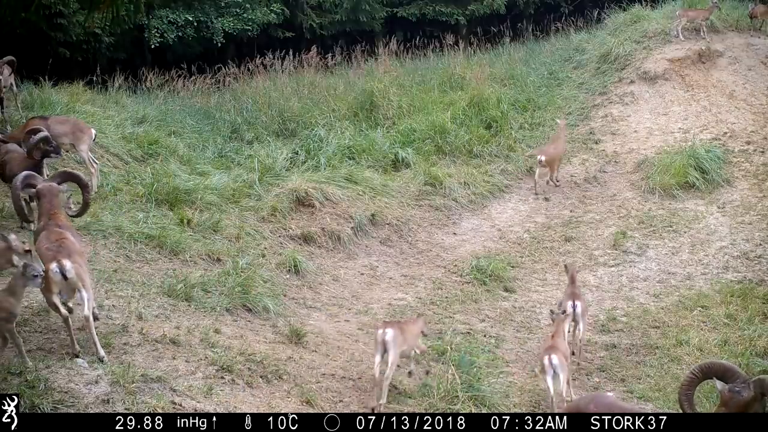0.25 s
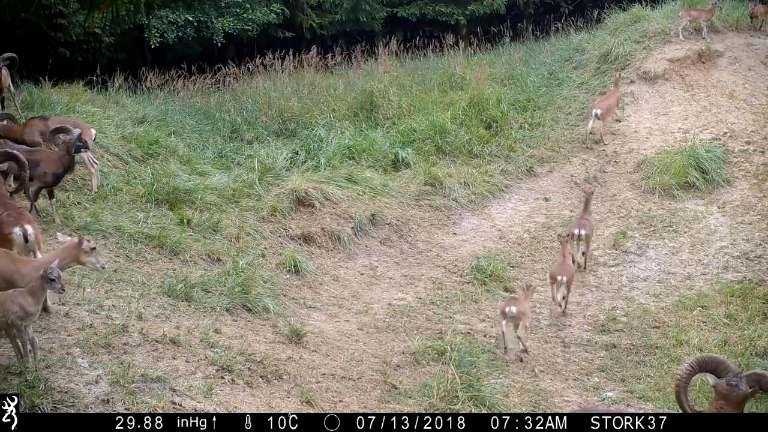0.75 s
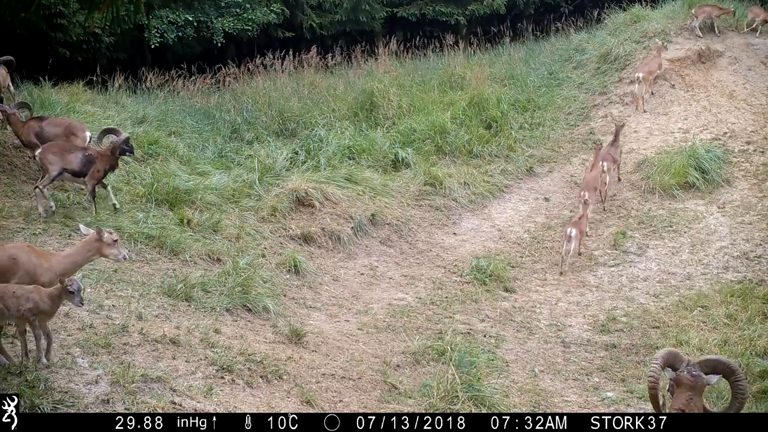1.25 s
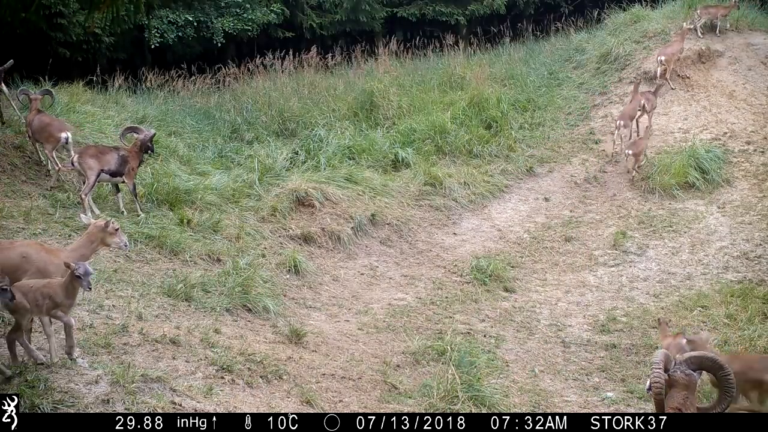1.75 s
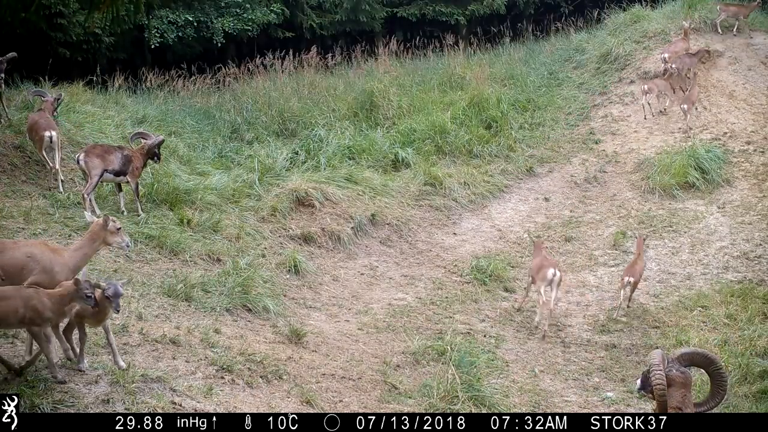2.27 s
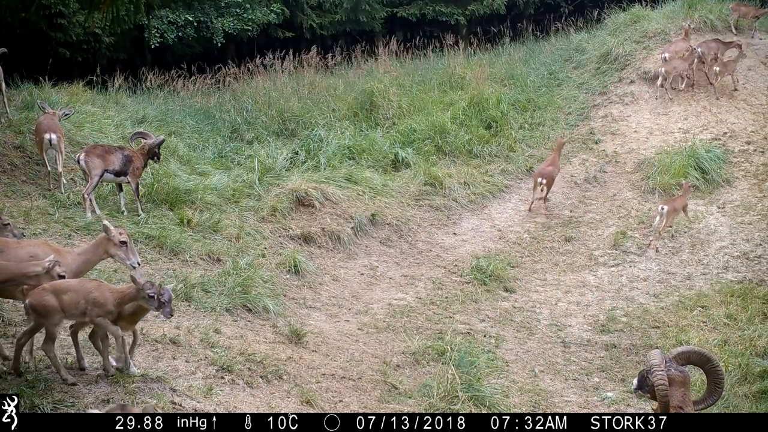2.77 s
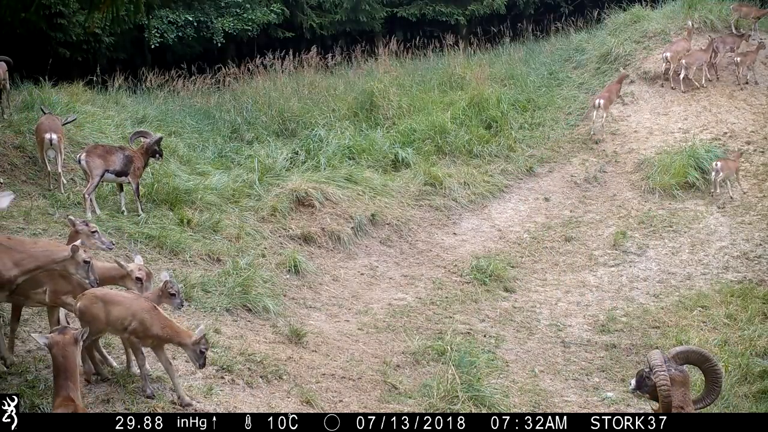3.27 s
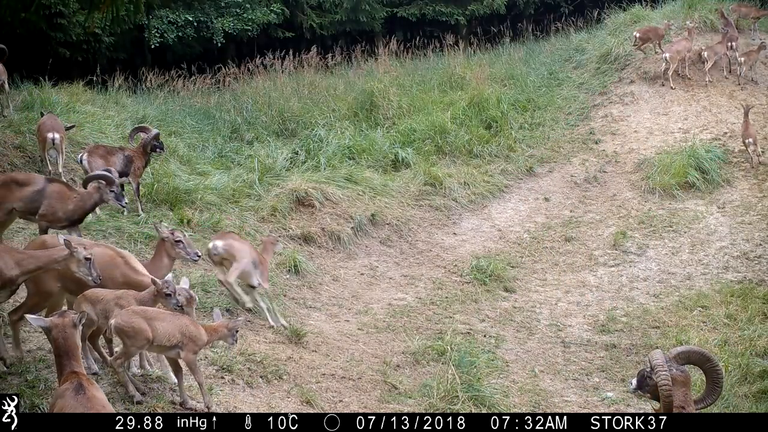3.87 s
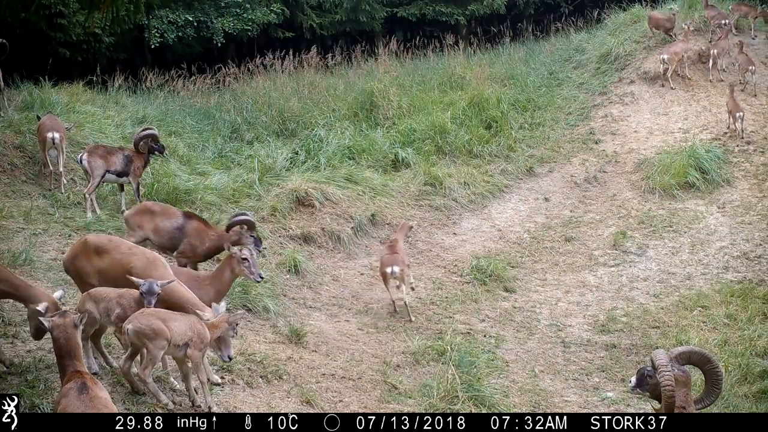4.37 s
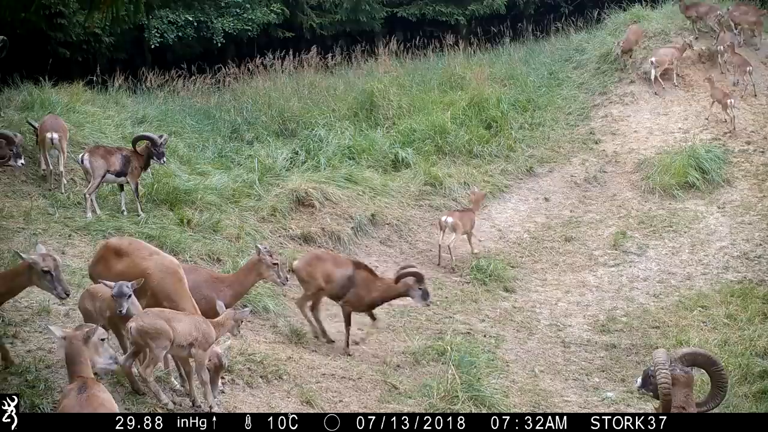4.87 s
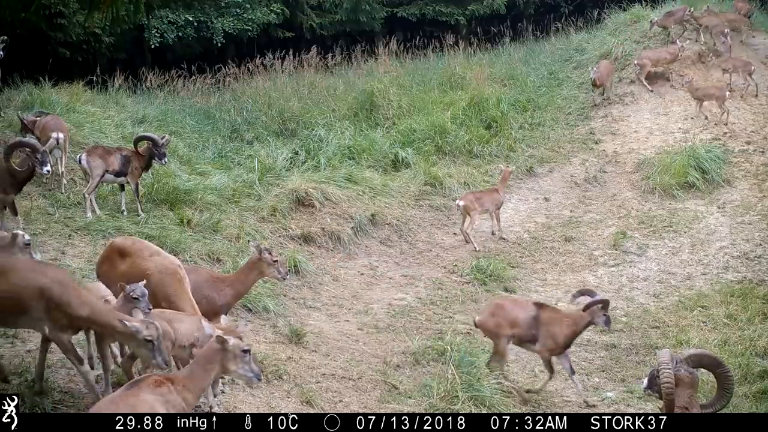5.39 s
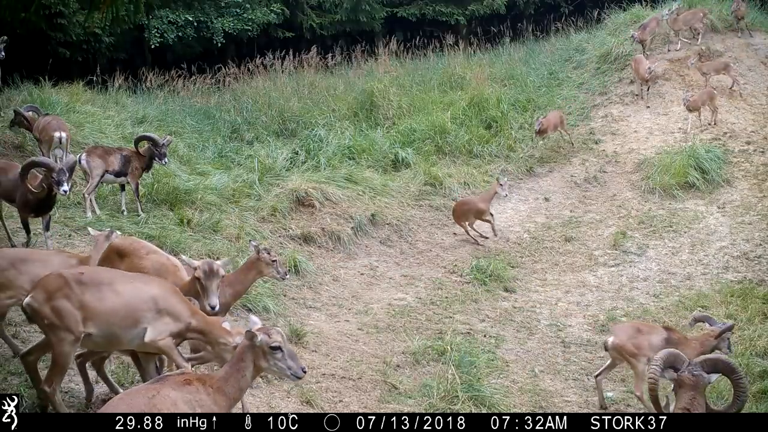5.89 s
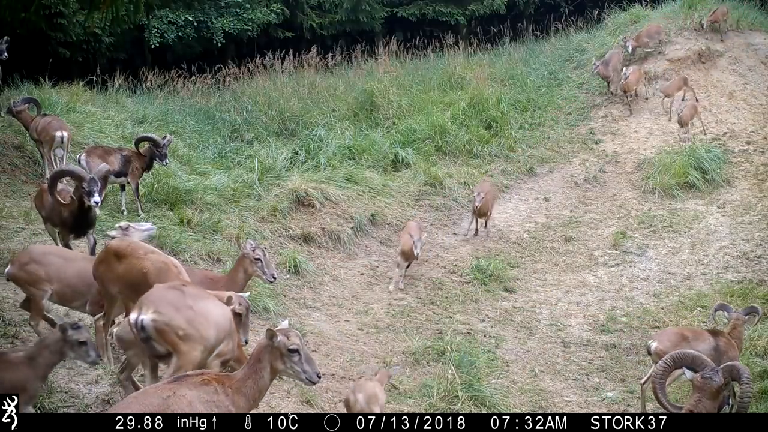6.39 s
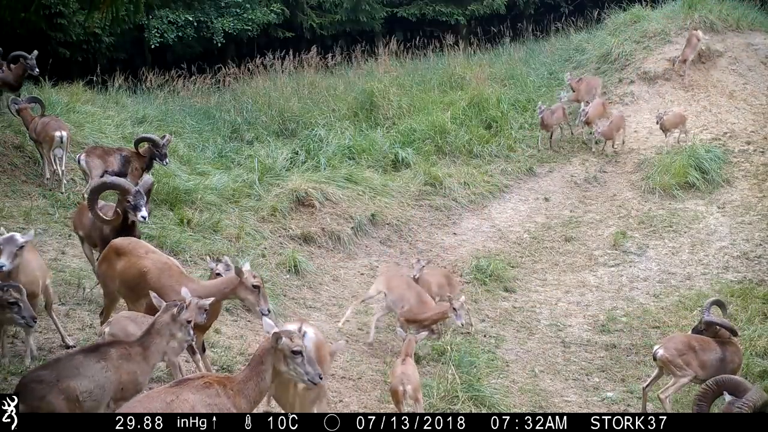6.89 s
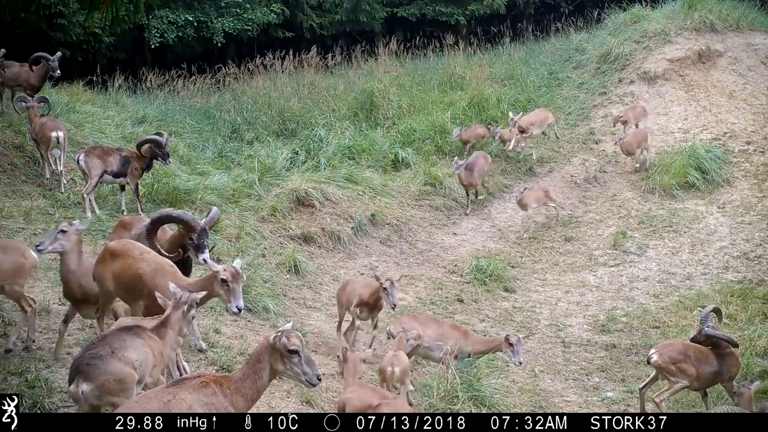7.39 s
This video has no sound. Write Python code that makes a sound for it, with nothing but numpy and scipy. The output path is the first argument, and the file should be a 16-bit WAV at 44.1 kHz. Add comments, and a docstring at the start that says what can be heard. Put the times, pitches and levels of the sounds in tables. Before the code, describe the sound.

On an open dry slope beside trees, a low ewe's bleat is already ending at 0 s and dies within about 0.1 s, leaving a faint woodland echo. From 0.2 to 0.65 s close hooves thud on soil, knock grit and snap stalks, with grassy scuffs. Soft snorts come near 0.9 and 1.1 s. A heavier burst of thuds and cracks falls at 1.2-1.4 s, with a sharp snap at 1.7 s. Steps then grow sparse and softer, around 2.9-4.3 s. At about 4.5 s a lamb hums with its mouth shut, then opens into a bright, quavering bleat from 4.75 to 5.1 s, echoing faintly. Scattered hoofsteps follow at 5.1-5.6 s, with snorts near 6.2 and 7.3 s and a brushing scuff by the end. Fluttering grass hiss, distant patter and low rumble persist, heard through a dull, narrow-band microphone.

```python
"""A ewe's low bleat dies away close to a small camera microphone, on a dry slope where wild sheep mill about.
Hooves thud on soil, knock on grit, snap stalks and scuff grass, by decaying rings and noise bursts.
Later a lamb hums, opens its mouth and bleats in quavering throbs: vocal-fold snaps ring a changing throat.
The forest edge answers with a noise tail; soft snorts, farther hooves, fluttering hiss and rumble fill the air."""
import sys
import numpy as np
from scipy import signal
from scipy.fft import rfft, irfft, next_fast_len
from scipy.io import wavfile
from scipy.ndimage import map_coordinates

SR = 44100
rng = np.random.default_rng(int(sys.argv[2]) if len(sys.argv) > 2 else 0)


def put_to_file(sound):
    """Save the sound as 16-bit audio at rate SR, in the file named by the first command-line argument."""
    columns = np.atleast_2d(sound).T  # one column per channel
    safe = np.clip(columns, -1, 1)
    whole_steps = np.round(safe * 32767)
    wavfile.write(sys.argv[1], SR, whole_steps.astype(np.int16))


N = 336905
TIME = np.arange(N) / SR
TOP_HZ = 4500  # top of the camera's band
KNOCK_HZ = 644  # middle of a hoof's knock on grit

# The nearest hooves landing.
# Each row: start in seconds, thud on soil in dB, knock on grit in dB before dulling, snap of stalks in dB.
HOOVES = [(0.211, -21.5, -20, -23), (.309, -21, -11.5, -33), (0.319, -13.5, -15.5, -12),
          (.348, -15.5, -15, -10.5), (.514, -30.5, -21, -20), (0.651, -18, -23, -28),
          (1.199, -24.5, -25, -15.5), (1.290, -9, -28, -19.5), (1.310, -9.5, -30, -10),
          (1.320, -10.5, -9, -25), (1.361, -28, -36, -18), (1.378, -18.5, -30, -39), (1.692, -20, -33, -19),
          (1.714, -13, -10, -4.5), (2.935, -25, -43, -44), (3.038, -36, -28, -38), (3.334, -39, -34, -21),
          (3.486, -27.5, -21.5, -39), (3.534, -36, -19.5, -38), (3.929, -37, -27.5, -40.5),
          (4.304, -25.5, -36, -40), (5.127, -19, -33.5, -34.5), (5.524, -21.5, -19, -18),
          (5.5827, -30, -14, -21), (6.264, -42, -26, -17), (7.139, -18.5, -36, -25),
          (7.346, -24.5, -36, -35)]


def amp(db):
    """Decibels to gain."""
    return 10 ** (np.asarray(db) / 20)


def unit(x):
    """Scale to rms 1."""
    return x / np.sqrt(np.mean(x ** 2) + 1e-20)


def colour(points):
    """Gain against frequency from (Hz, dB) points on a log axis."""
    point_hz, point_db = np.transpose(points)
    return lambda hz: amp(np.interp(np.log(hz + 1), np.log(point_hz), point_db))


def resonances(modes):
    """Response of parallel damped resonances (Hz, width Hz, dB), their signs alternating."""
    def response(hz):
        total = 0
        for k, (centre, width, db) in enumerate(modes):
            damping = 1j * hz * width
            total = total + (-1) ** k * amp(db) * damping / (centre * centre - hz * hz + damping)
        return total
    return response


def filtered(x, response):
    """Pass x through a response of frequency, with spare room for the ringing."""
    size = next_fast_len(len(x) + SR // 20)
    spectrum = rfft(x, size) * response(np.fft.rfftfreq(size, 1 / SR))
    return irfft(spectrum, size)[:len(x)]


def wobble(rate):
    """A smooth random curve through `rate` knots a second."""
    knots = rng.standard_normal(int(N * rate / SR) + 4)
    return map_coordinates(knots, [TIME * rate])


def add(track, start, sound):
    """Mix a sound into the track at a start in seconds."""
    part = track[max(round(start * SR), 0):][:len(sound)]
    part += sound[:len(part)]


def stir():
    """How much the herd stirs the grass at each sample, as a level in dB."""
    # Each row: time in seconds, level of the rustle in dB before its own lift and flutter.
    herd_stir = [(0.1, -37.5), (0.25, -38.5), (0.85, -46.5), (1.84, -44), (2.31, -47.5), (4.05, -50),
                 (4.55, -48.5), (4.6, -46.5), (5.35, -44.5), (5.96, -47), (6.34, -43.5), (6.61, -44.5),
                 (7.01, -40.5), (7.64, -44)]
    return np.interp(TIME, *np.transpose(herd_stir))


def background(rustle_db=2, rumble_db=-40.5, rumble_follows=0.16):
    """Low outdoor rumble and a fluttering hiss of grass, both shaped noise; the hiss swells as the herd stirs."""
    # Colour of the low rumble. Each row: frequency in Hz, density in dB per Hz.
    rumble_colour = [(20, -17.5), (40, -10.5), (55, 4.5), (70, -3), (100, -5), (150, -11), (280, -13.5),
                     (450, -16), (900, -24.5), (2000, -85.5)]
    # Colour of the rustling grass. Each row: frequency in Hz, density in dB per Hz.
    rustle_colour = [(100, -9.5), (400, 1.5), (700, 0), (1200, 0), (2200, -0.5), (3400, 0.5), (4500, -5)]
    stir_db = stir()
    rumble = unit(filtered(rng.standard_normal(N), colour(rumble_colour)))
    rustle = unit(filtered(rng.standard_normal(N), lambda hz: colour(rustle_colour)(hz) * (hz < TOP_HZ)))
    # The rumble follows only a share of the herd's stir.
    rumble_level_db = rumble_db + rumble_follows * (stir_db - stir_db.mean()) + 0.75 * wobble(16)
    flutter_db = 0.9 * wobble(25) + 1.1 * wobble(200)
    return rumble * amp(rumble_level_db) + rustle * amp(rustle_db + stir_db + flutter_db)


def herd(count=110, step_db=-49, knock_db=-57, tick_db=-53.0, spread_db=3, follows=0.5):
    """Farther hooves patter at random: dull bump, knock of grit, tick of grass, harder as the herd stirs."""
    blows, stir_db = np.zeros((3, N)), stir()
    places = rng.integers(0, N, count)
    chances = np.clip(rng.standard_normal((count, 3)), -2, 1.5)
    for place, chance in zip(places, chances):
        blows[:, place] = amp(spread_db * chance + follows * stir_db[place])
    soil = filtered(blows[0], lambda hz: resonances([(190, 170, 0)])(hz) ** 2)
    grit = filtered(blows[1], resonances([(KNOCK_HZ, 500, 0)]))
    grass = filtered(blows[2], resonances([(2000, 12000, 0)]))
    return amp(step_db) * unit(soil) + amp(knock_db) * unit(grit) + amp(tick_db) * unit(grass)


def swishes(rows, width, grain_db):
    """Swells of grainy noise, each in one broad resonance; width is a fraction of its centre."""
    out = np.zeros(N)
    for start, half, db, hz in rows:
        t = np.arange(-3 * half, 3 * half, 1 / SR)
        grains = rng.standard_normal(len(t)) * amp(grain_db * rng.standard_normal(len(t)))
        swish = unit(filtered(grains, lambda f: resonances([(hz, width * hz, 0)])(f) * (f < TOP_HZ)))
        swell = np.exp(-(t / half) ** 2 / 2)
        add(out, start + t[0], amp(db) * swish * swell)
    return out


def scuffs(half_s=0.016, centre_hz=2200):
    """Legs brush through dry grass in short, very grainy swishes."""
    # Each row: middle of the scuff in seconds, level in dB.
    brushes = [(.208, -33.5), (.535, -37.5), (.612, -34.5), (1.19, -32.5), (1.73, -39), (2.065, -34.5),
               (4.01, -39.5), (7.325, -30.5)]
    rows = [(at, half_s, db, centre_hz) for at, db in brushes]
    return swishes(rows, width=2.0, grain_db=6.0)


def thuds(t60=0.058, rise=0.0015, crumble=0.43, crumble_t60=0.096):
    """Soil gives a few low cycles under each hoof; crumbling earth rumbles a little longer (times in s)."""
    # Harder steps ring lower: pitch at a middling step, and the rise in level that halves it.
    soil_hz, soil_at_db, soil_db_per_octave = 161.8, -20, 30
    earth_colour = [(30, -38.5), (90, -4), (250, 5.0), (550, -18), (2000, -33.0)]  # Hz, dB
    out, t = np.zeros(N), np.arange(SR // 6) / SR
    for start, db, _, _ in HOOVES:
        hz = soil_hz * 2 ** ((soil_at_db - db) / soil_db_per_octave)
        earth = unit(filtered(rng.standard_normal(len(t)), colour(earth_colour)))
        ring = np.sin(2 * np.pi * hz * t) * amp(-60 * t / t60)
        crumbling = crumble * earth * amp(-60 * t / crumble_t60)
        add(out, start, amp(db) * (1 - np.exp(-t / rise)) * (ring + crumbling))
    return out


def cracks(times, levels_db, hz, width, t60, splinter, crunch=0.052, press=0.004):
    """The hoof presses with a short crunch; then one sharp break and a few milliseconds of splinters."""
    out, lead = np.zeros(N), SR // 50
    t = np.arange(-lead, 2 * lead) / SR
    pressing = crunch * np.exp(-abs(t) / press)
    splintering = splinter * amp(-60 * abs(t) / t60)
    for start, db in zip(times, levels_db):
        burst = rng.standard_normal(len(t)) * np.where(t < 0, pressing, splintering)
        burst[lead] += 1  # the break itself
        centre = hz * np.exp(0.13 * rng.normal())  # no two stalks or stones are alike
        crack = filtered(burst, lambda f: resonances([(centre, width * centre, 0)])(f) * (f < TOP_HZ))
        add(out, start + t[0], amp(db) * crack / np.abs(crack).max())
    return out


def footfalls():
    """Legs brush the grass; each landing hoof thuds, knocks on grit and snaps stalks."""
    times, _, knock_db, snap_db = np.transpose(HOOVES)
    knocks = cracks(times, knock_db, KNOCK_HZ, width=0.75, t60=0.02, splinter=0.093, crunch=0.05, press=0.003)
    knocks = filtered(knocks, colour([(1500, 0), (3000, -3.5)]))  # horn on grit is dull
    snaps = cracks(times, snap_db, hz=2630, width=1.0, t60=0.02, splinter=0.057)
    return thuds() + knocks + snaps + scuffs()


def outdoors(x, ground_db, forest_db, ground_t60=0.023, forest_t60=0.7, onset=0.023):
    """Ground and nearby bodies scatter the call at once; the trees send back a faint long tail (times in s)."""
    # Colour of the forest's echo. Each row: frequency in Hz, gain in dB.
    forest_colour = [(150, -1.5), (700, -2), (1300, -13), (1850, 1), (2300, -3), (2850, 7.5), (3400, -1.5),
                     (4000, -12)]
    t = np.arange(SR) / SR
    near = unit(rng.standard_normal(SR) * amp(-60 * t / ground_t60) * (t > 0.002))
    far = unit(rng.standard_normal(SR) * amp(-60 * t / forest_t60) * (1 - np.exp(-t / onset)))
    answer = amp(ground_db) * near + amp(forest_db) * filtered(far, colour(forest_colour))
    return x + signal.fftconvolve(x, answer / np.sqrt(SR))[:N]


def snorts():
    """Soft snorts from the herd: breath noise swelling through a nose resonance."""
    # Each row: middle in seconds, half length in seconds, level in dB, nose resonance in Hz.
    breaths = [(.862, 0.019, -39.5, 730), (1.075, .035, -37, 1060), (6.215, .015, -41, 1500),
               (7.318, .022, -34.5, 1780)]
    return swishes(breaths, width=0.46, grain_db=-1.0)


def voice(start, end, pitch, level_db, throat_at, jitter, scatter_db, rasp, lag, soft_hz):
    """Each snap of the vocal folds, with a puff of turbulent air, rings the throat as it is shaped just then."""
    out, t = np.zeros(N), np.arange(SR // 40) / SR
    sounding = (TIME > start) * (TIME < end)
    cycles = np.floor(np.cumsum(pitch * sounding) / SR)

    def folds(hz):
        """Soft folds cannot snap sharply; the top of the band speaks `lag` seconds after the bottom."""
        spread = np.exp(-1j * np.pi * lag * hz * hz / TOP_HZ)
        return spread / (1 + (hz / soft_hz) ** 10)

    for i in np.flatnonzero(np.diff(cycles)):
        puff = rng.standard_normal(len(t)) * np.exp(-t * pitch[i] * 2)
        snap = rasp * unit(puff) / np.sqrt(len(t))
        snap[0] += 1
        ring = unit(filtered(snap, lambda hz: resonances(throat_at(i / SR))(hz) * folds(hz)))
        # Scaled by the period, so that the level does not hang on the pitch.
        size = amp(level_db[i] + scatter_db * rng.normal()) * np.sqrt(SR / pitch[i] / len(t))
        add(out, i / SR + jitter * rng.normal() / pitch[i], size * ring)
    return out


def ewe():
    """A lower, open-mouthed bleat dies away; its part before time 0 still rings in the trees."""
    # The bleat, already under way at time 0. Each row: time in seconds, pitch in Hz, level in dB.
    bleat = [(-.25, 129, -15), (0, 130.6, -10.5), (0.011, 134.1, -17.5), (0.022, 132.7, -10.5),
             (0.04, 129, -20), (.064, 128.8, -24), (.085, 129.5, -40), (.1, 128, -52)]
    # Her throat and nose. Each row: resonance in Hz, width in Hz, level in dB.
    throat = [(140, 50, -12.5), (640, 300, -12.5), (802, 83, -3), (990, 54, -9), (1380, 220, -15),
              (1950, 210, -7.5), (2850, 440, -14), (3330, 440, -11)]
    s, pitch, db = np.transpose(bleat)
    follow = lambda column: np.interp(TIME + s[0], s, column)
    call = voice(0, s[-1] - s[0], follow(pitch), follow(db), lambda t: throat,
                 jitter=0.003, scatter_db=1.1, rasp=0.61, lag=0.0021, soft_hz=4300)
    early = round(-s[0] * SR)  # samples that sound before time 0
    heard = outdoors(call, ground_db=-6.0, forest_db=-18.0)[early:]
    return np.pad(heard, (0, early))


def lamb(sag=0.1, waver=0.0016, gap_shape=1.3, sag_shape=2.6):
    """Air comes in regular throbs; between them level and pitch sag. The mouth opens as the call goes on."""
    # The call before its throbs.
    # Each row: time in seconds, pitch in Hz, level in dB, mouth from 0 shut to 4 wide (held at 4 above that).
    call = [(4.55, 158.1, -32.5, 0), (4.66, 166, -34.5, 0), (4.745, 157.2, -30, 0.8),
            (4.76, 177.9, -14.5, 1), (4.845, 183.6, -9.5, 2.5), (4.903, 192.8, -7.5, 2.5),
            (4.96, 198.7, -7.5, 3.5), (5.022, 198.7, -9.5, 3.5), (5.09, 190.6, -11.5, 5.5)]
    # Throat and nose for mouth shut, parted, half open, open and wide.
    # Each row within a shape: resonance in Hz, width in Hz, level in dB.
    shapes = np.array([
        [(200, 67, 4), (700, 130, -7), (1070, 90, -8.5), (1945, 70, -23.5), (2320, 170, -11),
         (3040, 240, -20.5), (3550, 150, -30.5)],
        [(192, 74, -17.5), (1030, 84, -5), (1446, 250, -28), (2054, 91, 0), (2680, 290, -6), (3100, 200, -1),
         (3500, 150, -27)],
        [(195, 87, -17.5), (630, 130, -20.5), (1230, 360, -21), (1944, 60, -12), (2850, 210, 1.5),
         (3005, 220, -2.5), (3800, 150, -27.5)],
        [(196, 130, -22.5), (720, 110, -17.5), (1325, 330, -19.5), (1944, 75, 0), (2780, 166, -1.5),
         (3222, 190, -1.5), (3460, 86, -13.5)],
        [(195, 360, -13), (726, 103, -8.5), (1313, 330, -11.5), (1916, 75, 2.5), (2670, 270, -3),
         (3253, 130, 1), (3575, 79, -4)],
    ])
    hum_start_s, bleat_start_s, bleat_end_s = 4.525, 4.747, 5.12
    hum_throbs_per_s, bleat_throbs_per_s = 13.4, 16.4  # the quaver quickens as the mouth opens
    hum_dip_db, bleat_dip_db = 15.5, 9  # with the mouth shut the voice nearly stops between throbs
    first_dip_db, settle_s = 17.5, 0.072  # extra dip early in the bleat, and the time in which it fades
    release_s, release_db, release_sag = 0.022, 4.5, 0.08  # last throb: level and share of pitch lost

    s, pitch, db, mouth = np.transpose(call)
    follow = lambda column: np.interp(TIME, s, column)
    since = TIME - bleat_start_s
    humming = since < 0
    beat = since * np.where(humming, hum_throbs_per_s, bleat_throbs_per_s)  # a whole number at each gap
    slack = np.cos(np.pi * beat) ** 2
    first_dips_db = first_dip_db * (beat > 0.5) * np.exp(-(since / settle_s) ** 2)
    dip_db = np.where(humming, hum_dip_db, bleat_dip_db) + first_dips_db
    release = np.clip(1 - (bleat_end_s - TIME) / release_s, 0, 1)  # the last throb runs out of air
    level_db = follow(db) - dip_db * slack ** gap_shape - release_db * release
    bend = 1 - sag * slack ** sag_shape - release_sag * release + waver * wobble(70)

    def throat_at(t):
        """Blend the two mouth shapes on either side of the present opening."""
        opening = np.clip(np.interp(t, s, mouth), 0, len(shapes) - 1)
        shares = np.maximum(1 - abs(np.arange(len(shapes)) - opening), 0)
        return np.tensordot(shares, shapes, 1)

    return voice(hum_start_s, bleat_end_s, follow(pitch) * bend, level_db, throat_at,
                 jitter=0.003, scatter_db=0.82, rasp=0.15, lag=0.0024, soft_hz=3810)


def scene():
    """Air, hooves and calls at one microphone."""
    calls = ewe() + outdoors(lamb() + snorts(), ground_db=-14, forest_db=-16.5)
    return (background() + herd() + footfalls() + calls)[None]


def record(dry):
    """The camera dulls the top and keeps only a narrow band; peaks are held within full scale before the band cut."""
    # The microphone's fall at the top. Each row: frequency in Hz, gain in dB.
    microphone = [(3400, 0), (3750, -1), (4050, -7.5), (4300, -16.5), (4500, -29.5)]
    heard = np.clip(filtered(dry[0], colour(microphone)), -1, 1)
    return filtered(heard, lambda hz: hz < TOP_HZ)[None]


dry = scene()
out = record(dry)
put_to_file(out)
```